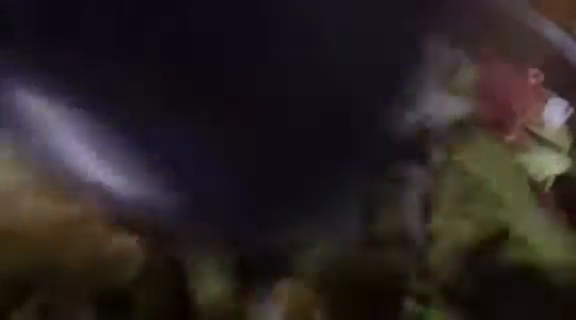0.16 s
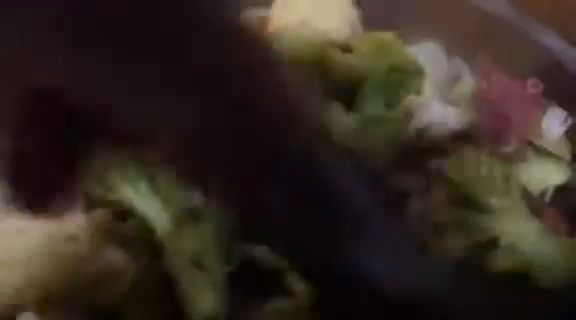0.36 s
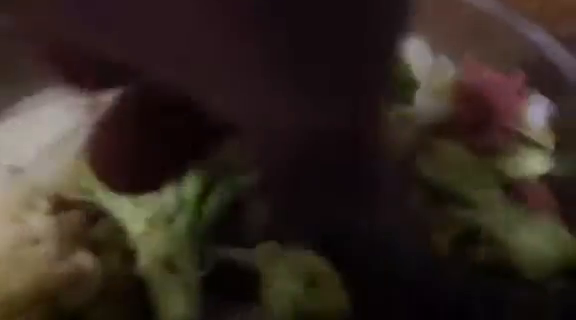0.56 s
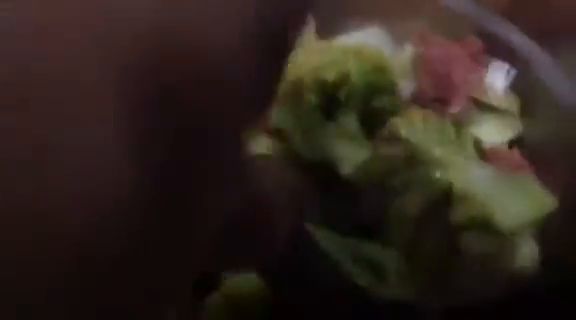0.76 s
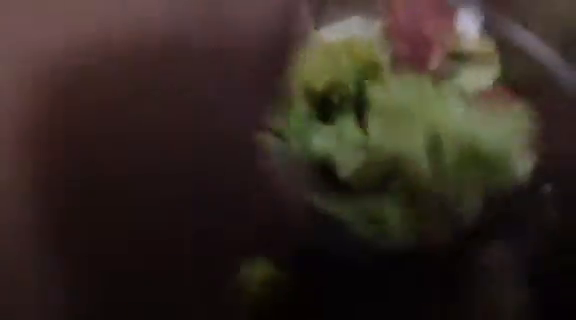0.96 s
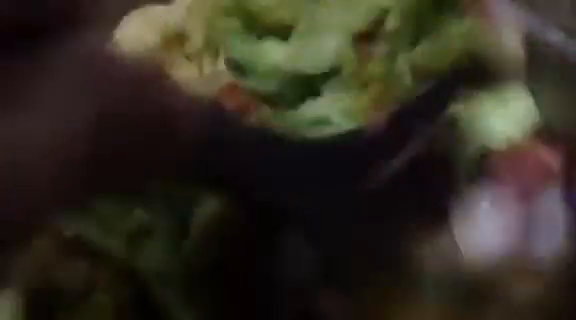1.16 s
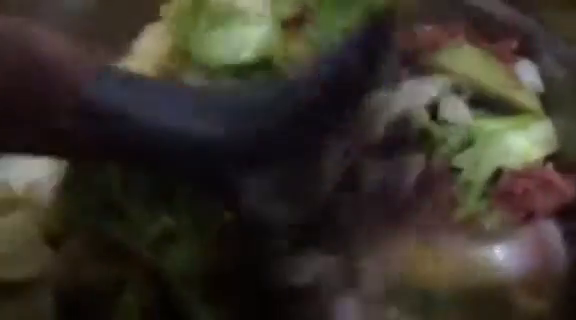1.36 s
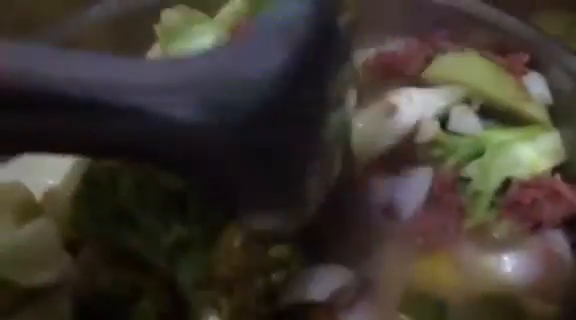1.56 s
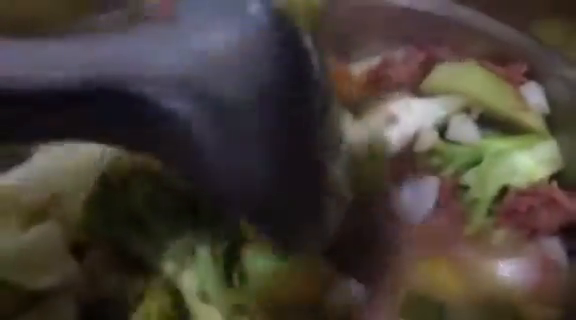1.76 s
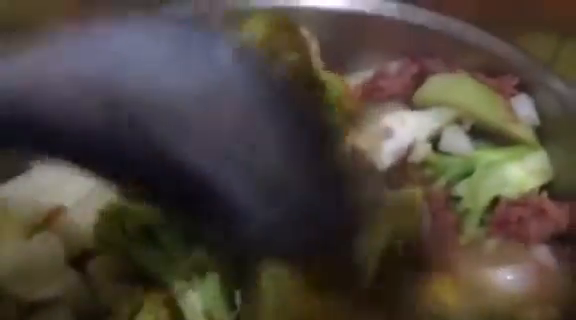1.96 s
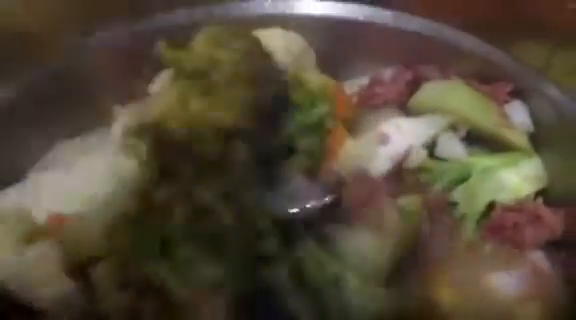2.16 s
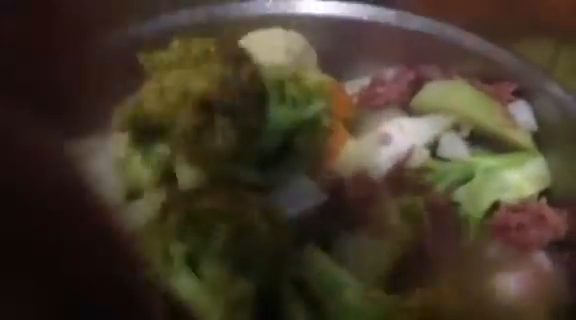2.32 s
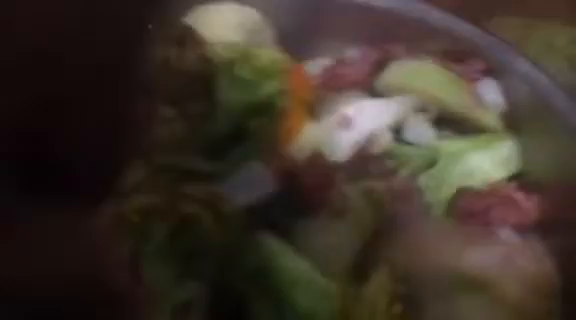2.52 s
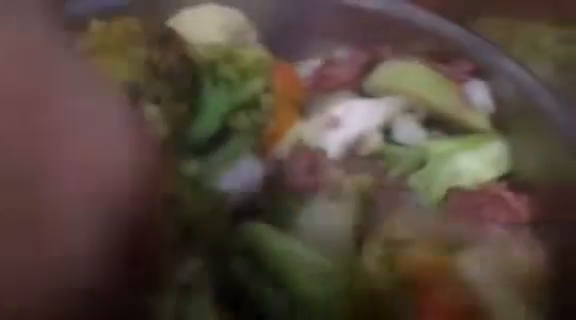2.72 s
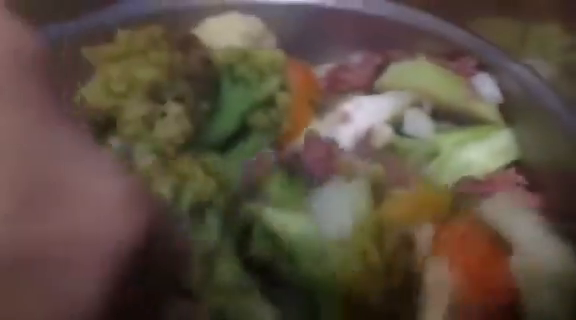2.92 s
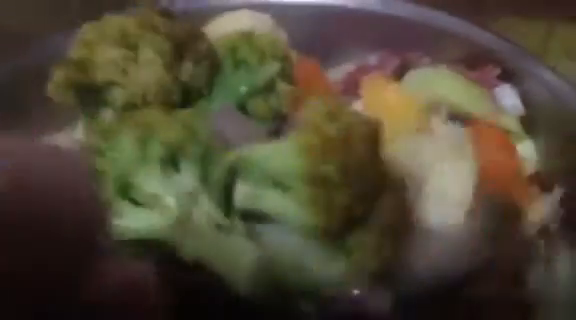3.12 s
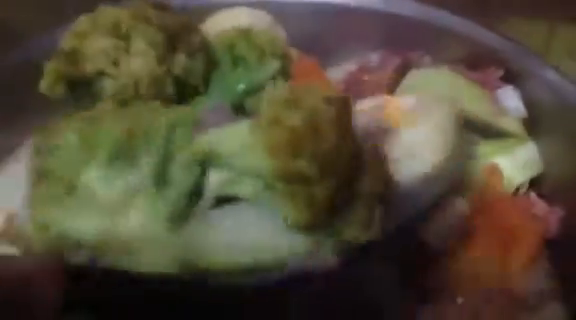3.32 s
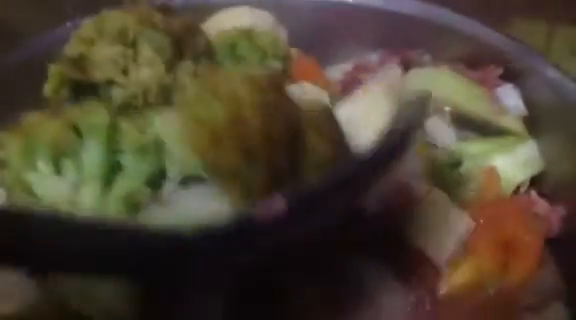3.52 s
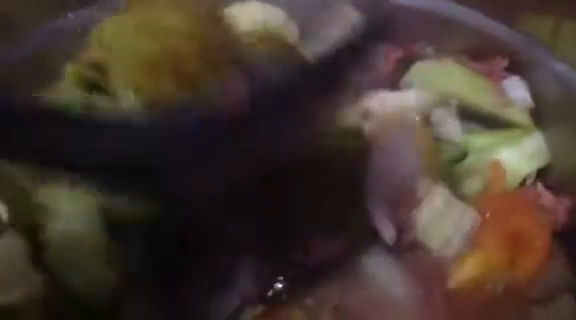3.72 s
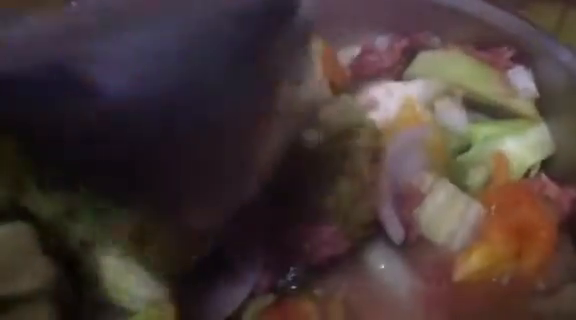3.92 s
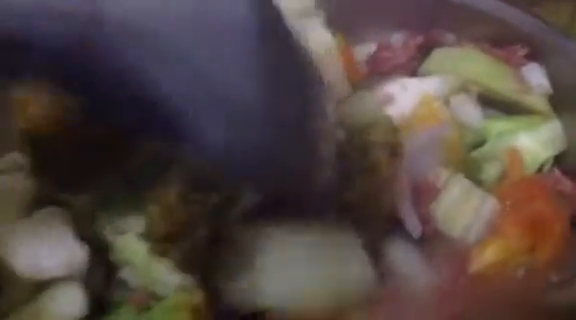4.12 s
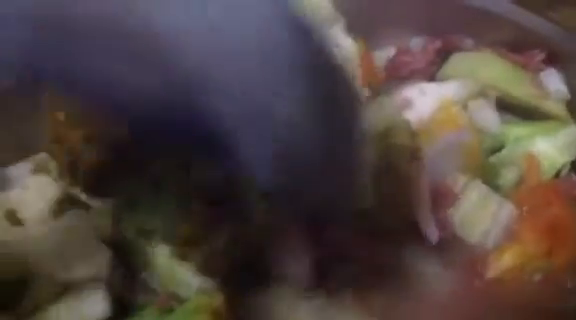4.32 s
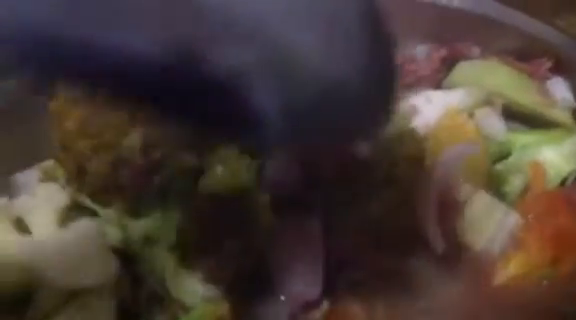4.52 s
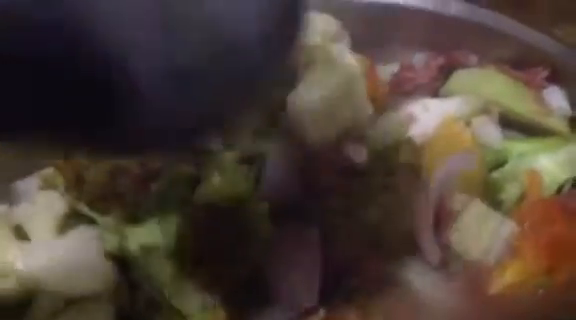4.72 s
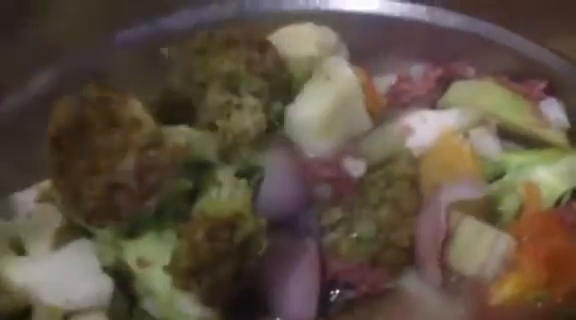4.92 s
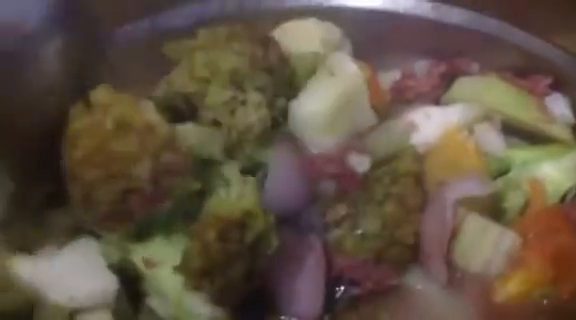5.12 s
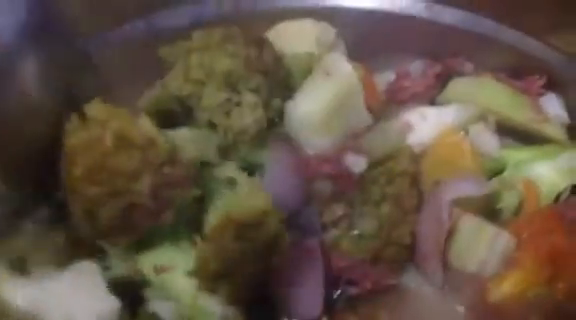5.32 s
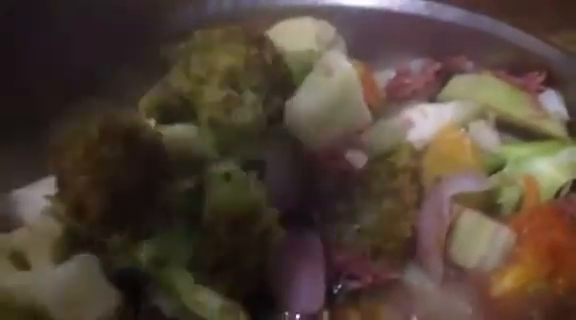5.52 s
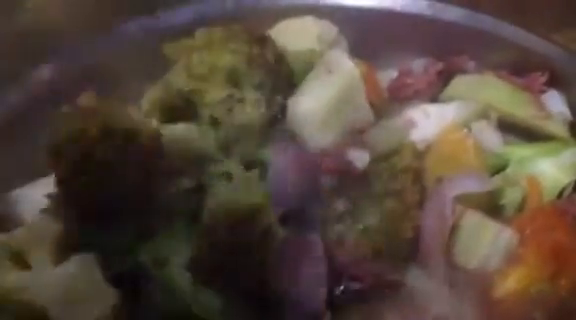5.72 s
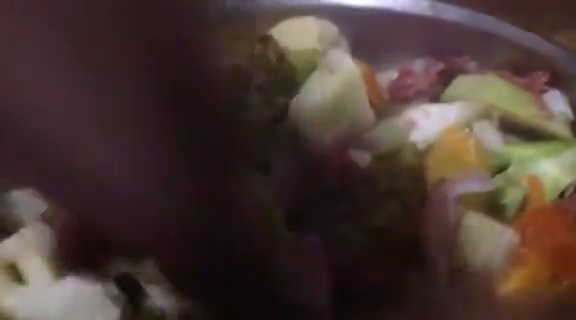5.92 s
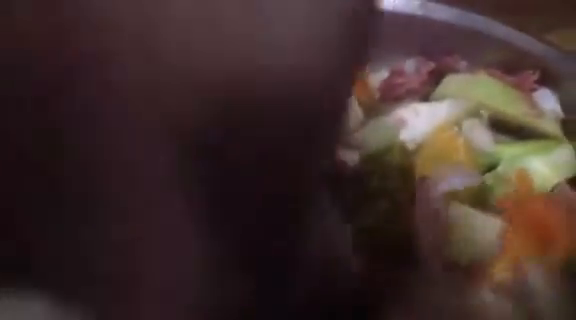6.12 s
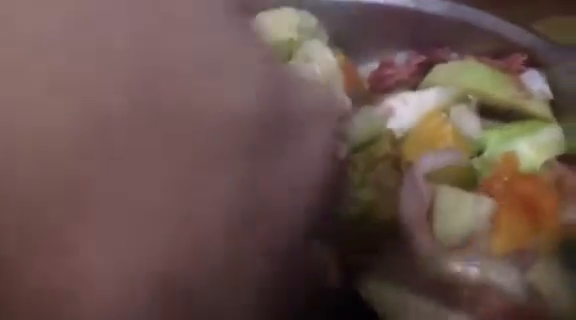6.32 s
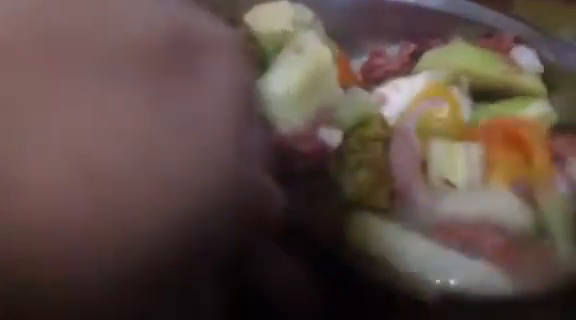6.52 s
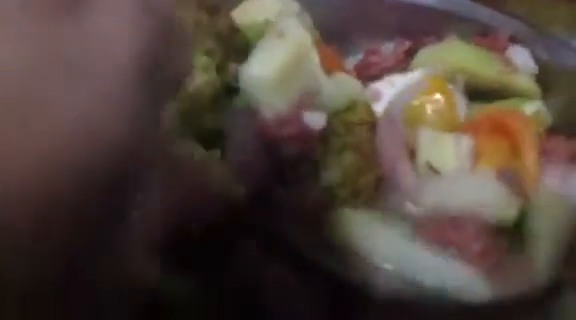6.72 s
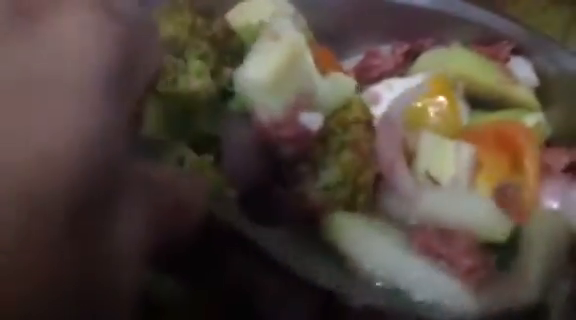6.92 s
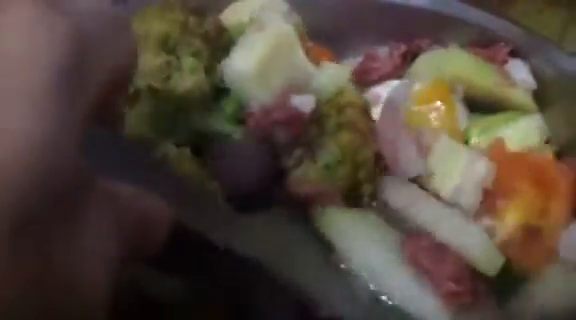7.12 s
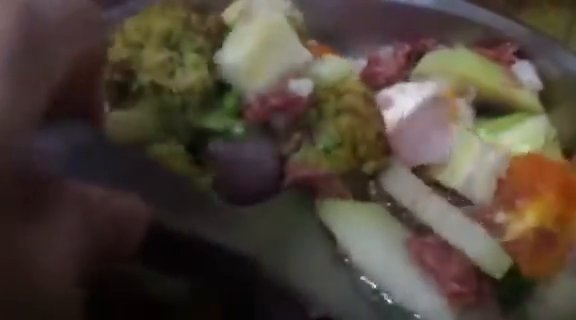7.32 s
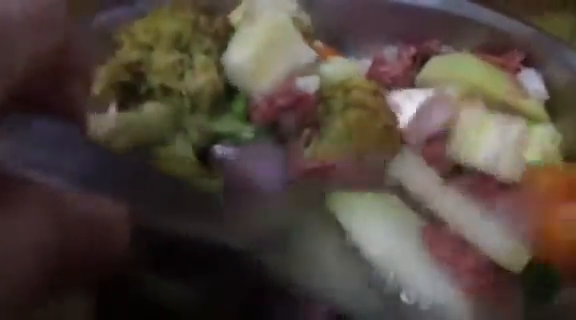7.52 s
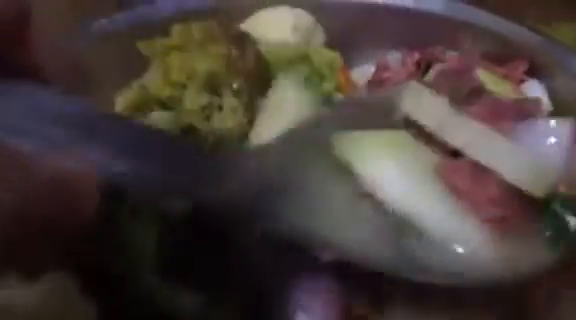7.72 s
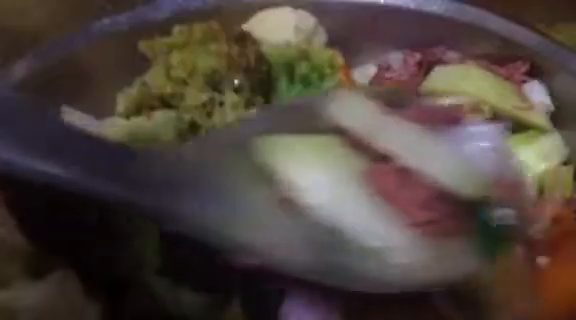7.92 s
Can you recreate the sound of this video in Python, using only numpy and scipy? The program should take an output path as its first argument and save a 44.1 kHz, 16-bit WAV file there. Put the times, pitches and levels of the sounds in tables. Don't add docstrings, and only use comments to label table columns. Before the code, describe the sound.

Steady gentle sizzling fills a small kitchen, brightening and dulling as a metal spoon moves the food. Short gritty scrapes, hollow little snaps and wet ticks come in clusters with each push. Three main metal clinks stand far above the rest: early and sharp, then softer, then loud and ringing. Room rumble and a faint distant appliance tone lie beneath, captured close with limited treble, slightly grainy compression and little echo.

```python
import sys
import numpy as np
from scipy import signal
from scipy.fft import rfft, irfft, dct
from scipy.io import wavfile
from scipy.ndimage import uniform_filter1d

SR = 44100
rng = np.random.default_rng(int(sys.argv[2]) if len(sys.argv) > 2 else 0)


def generate_wav(sig):
    pcm = np.round(np.clip(np.atleast_2d(sig).T, -1, 1) * 32767).astype(np.int16)
    wavfile.write(sys.argv[1], SR, pcm)


def nominal_scale(level):
    x = np.asarray(level, float) / 20
    return 10 ** x


N = 355446


def evened(x):
    return x / np.sqrt(np.mean(x ** 2) + 1e-20)


def peaked(x):
    return x / np.max(abs(x))


def read(points, hz):
    f, value = np.transpose(points)
    return np.interp(np.log(hz + 1), np.log(f + 1), value)


def add(mix, s, sound):
    part = mix[round(s * SR):][:len(sound)]
    part += sound[:len(part)]


def filtered(x, order, hz, kind="low"):
    return signal.sosfilt(signal.butter(order, hz, kind, fs=SR, output="sos"), x)


def coloured(x, spectrum):
    gain = nominal_scale(read(spectrum, np.fft.rfftfreq(len(x), 1 / SR)))
    return evened(irfft(rfft(x) * gain, len(x)))


def arches(rows, rest_db):
    t = np.arange(0, N + 64, 64) / SR
    power = nominal_scale(rest_db) ** 2
    for s, length, db in rows:
        power = power + nominal_scale(db) ** 2 * np.exp(-(3 * (t - s) / length) ** 2)
    return np.sqrt(np.interp(np.arange(N) / SR, t, power))


def wash(spectrum, patchy_db, flicker_db):
    frames = N // 128 + 5
    a, b, patches = rng.standard_normal((frames, 257, 3)).T
    patches = evened(uniform_filter1d(uniform_filter1d(patches, size=8, axis=0), size=14, axis=1))
    flicker = evened(uniform_filter1d(rng.standard_normal(frames), size=5))
    z = (a + 1j * b) * nominal_scale(patchy_db * patches + flicker_db * flicker)
    noise = signal.istft(z, nperseg=512, noverlap=384)[1][:N]
    return coloured(noise, spectrum)


def crackle(per_s, spread_db, cycles, low_hz, high_hz, count=20):
    struck = rng.random(N) < per_s / SR
    size = nominal_scale(spread_db * np.minimum(rng.exponential(1, N), 5)) * struck
    kind = rng.integers(0, count, N)
    t, out = np.arange(600) / SR, np.zeros(N)
    for k, hz in enumerate(np.geomspace(low_hz, high_hz, count)):
        grain = np.exp(-t * hz / cycles) * np.sin(2 * np.pi * hz * t)
        out += signal.oaconvolve(size * (kind == k), grain / np.linalg.norm(grain))[:N]
    return evened(out)


# [t/s, hiss level/dB]
STIR = [(0.0, -59), (0.7, -56), (1.0, -58.5), (1.37, -54), (1.82, -56), (2.4, -56), (2.71, -51.5),
        (3.1, -55), (3.34, -53.5), (4.4, -56), (4.78, -55), (6.17, -55.5), (6.51, -62.5), (6.98, -58.5),
        (7.231, -62.5), (7.62, -58), (7.8, -53.5), (8.06, -56)]
# [f/Hz, level/dB per Hz]
HISS = [(410, -22), (700, -20.5), (937, -2), (1180, 5), (1510, -8), (2000, -3), (2730, 4), (3160, -0.5),
        (3970, 0), (6820, -3.5), (7600, -5), (8400, -75), (10900, -84), (18500, -120)]
# [strongest t/s, length/s, level/dB]
SLIPPING = [
    (.65, 0.8, -56.5),
    (2.8, 0.73, -65),
    (3.38, 0.4, -50.5),
    (4.2, 1.33, -56.5),
    (4.76, 0.45, -49),
    (5.9, 1.24, -60.5),
    (7.58, 0.84, -57),
]


def food():
    hiss = wash(HISS, patchy_db=1.0, flicker_db=1.5)
    fine = nominal_scale(-5) * crackle(800, spread_db=3.6, cycles=1.8, low_hz=2000, high_hz=8010)
    slips = crackle(250, spread_db=3.4, cycles=4.0, low_hz=2200, high_hz=3500)
    level_db = np.interp(np.arange(N) / SR, *np.transpose(STIR))
    sizzle = evened(hiss + fine)
    bright_hz, open_db, dulling = 3500, -55, 0.37
    mids = signal.sosfiltfilt(signal.butter(2, bright_hz, fs=SR, output="sos"), sizzle)
    sizzle = sizzle + (nominal_scale(dulling * (open_db - level_db)) - 1) * mids
    resting_db = -64.5
    return nominal_scale(level_db) * sizzle + nominal_scale(-5.0) * arches(SLIPPING, resting_db) * slips


# [f/Hz, level/dB per Hz]
HUM = [(15, -58), (25, -16), (50, -16.5), (74, -9), (95, -13), (134, 0.5), (196, -4), (273, 1), (344, -5),
       (525, -4), (589, -3), (936, -12.5), (1180, -12.5), (1800, -16.5), (2500, -34.5), (3250, -46.5),
       (5500, -120)]
# [strongest t/s, length/s, level/dB]
SWELLS = [
    (0.0, 0.31, -51),
    (.65, 1.07, -52.5),
    (1.4, 0.44, -60),
    (2.58, 0.39, -52.5),
    (3.34, 0.23, -58.5),
    (5.1, 1.04, -54.5),
    (6.95, 0.84, -53.5),
    (7.45, 0.37, -58),
    (8.0, 1, -58.5),
]
# [strongest t/s, length/s, level/dB]
DRONE = [
    (.1, 0.4, -54.5),
    (.6, 0.34, -60),
    (1.0, 0.39, -61),
    (2.53, 0.57, -62.5),
    (4.31, 0.39, -61.5),
    (5.3, 0.58, -61),
    (7.1, 1.43, -59),
]


def hum():
    rumble = arches(SWELLS, -55.5) * wash(HUM, patchy_db=1.67, flicker_db=1.03)
    slow = uniform_filter1d(rng.standard_normal((2, N)), size=2500)
    a, b = uniform_filter1d(slow, size=2500)
    drone_hz = 293.4
    tone = evened(((a + 1j * b) * np.exp(2j * np.pi * drone_hz * np.arange(N) / SR)).real)
    return rumble + arches(DRONE, -69.5) * tone


def snap(db, hz, t60, tick_db):
    t = np.arange(3000) / SR
    wobble, tick = rng.standard_normal((2, len(t)))
    turns = np.cumsum(hz * (1 + 0.1 * evened(uniform_filter1d(wobble, size=30)))) / SR
    ring = nominal_scale(-60 * t / t60) * np.sin(2 * np.pi * turns) * np.minimum(t / .0007, 1)
    return nominal_scale(db) * (ring + nominal_scale(tick_db) * peaked(tick * nominal_scale(-60 * t / .009)))


def pieces(rows, t60, tick_db):
    out = np.zeros(N)
    for s, db, hz in rows:
        add(out, s, snap(db, hz, t60, tick_db))
    return out


# [t/s, peak level/dB, f/Hz]
SNAPS = [(0.091, -34.5, 3140), (0.622, -42, 2620), (1.309, -41, 3660), (1.4, -44.5, 2730),
         (1.465, -33.5, 3410), (2.465, -37, 2780), (2.739, -42, 3120), (3.283, -37.5, 2790),
         (3.319, -38.5, 2870), (3.414, -39.5, 2190), (3.485, -36, 2350), (3.567, -40.5, 2250),
         (3.667, -38, 3220), (3.731, -37, 2880), (4.524, -34, 2810), (4.534, -38.5, 3420),
         (4.575, -40.5, 2200), (4.693, -39, 3050), (4.839, -33, 2790), (4.925, -39.5, 3670),
         (6.047, -22.5, 2490), (6.065, -39.5, 2840), (6.233, -42, 2410), (6.975, -37.5, 2480),
         (7.465, -37.5, 2620), (7.551, -37, 3400), (7.558, -32, 2650), (7.74, -42, 2810),
         (7.799, -43, 3100)]


def snaps():
    return pieces(SNAPS, t60=0.023, tick_db=-5.5)


# [f/Hz, level/dB per Hz]
RATTLE = [(180, -45), (300, -30.5), (1180, -19), (1530, -28.5), (1940, -29.5), (2300, -29), (2600, -16.5),
          (4880, -22), (7210, -18.5), (8400, -24.5), (10900, -73), (18500, -120)]


def clink(modes, db, crack_db, rattle_db, rattle_t60):
    t = np.arange(SR // 2) / SR
    phases, noise = rng.random((30, 2)), rng.standard_normal((2, len(t)))
    ring = np.zeros(len(t))
    for (hz, mode_db, t60), (lag, pace) in zip(modes, phases):
        turns = (12 + 50 * pace) * t + .4 * np.sin(2 * np.pi * (9 + 30 * lag) * t)
        flutter = 1 + .5 * np.cos(2 * np.pi * turns)
        ring += nominal_scale(mode_db - 60 * t / t60) * flutter * np.sin(2 * np.pi * (hz * t + .6 * lag))
    crack = coloured(noise[0], RATTLE) * nominal_scale(-60 * t / 0.034)
    rattle = coloured(noise[1], RATTLE) * nominal_scale(-60 * t / rattle_t60)
    small = nominal_scale(crack_db) * peaked(crack) + nominal_scale(rattle_db) * peaked(rattle)
    small = filtered(small, 3, 1.35 * modes[0][0], "high")
    contact = 1 + .7 * np.exp(-t / 0.014)
    blow = ring / 10 * contact + small
    return nominal_scale(db) * blow * np.minimum(t / 0.00081, 1) ** 2


# [t/s, peak level/dB, crack re peak/dB, rattle re peak/dB, rattle t60/s]
CLINKS = [
    (.455, -8.5, -3, -7, 0.062),
    (2.5526, -20, 4, -10.5, 0.096),
    (5.7727, -7, -1, -6.5, 0.13),
    (5.818, -24.5, -0.5, -8, 0.12),
]
# [f/Hz, level/dB, t60/s]
WALL = [(1116, -3, 0.09), (1192, -2, 0.1), (1850, -7, 0.1), (1933, -1, 0.16), (2010, -7, 0.18),
        (2628, -2, 0.13), (2700, 4, 0.1), (2800, 1, 0.09), (2908, -5, 0.08), (3093, -6, 0.1),
        (3289, -10, 0.15), (3549, 0, 0.13), (4050, 2, 0.06), (4532, -4, 0.12), (4793, -3, 0.14),
        (4985, -7, 0.18), (5484, -3, 0.13), (5840, -7, 0.15), (6060, 0, 0.08), (6500, 6, 0.05),
        (6987, -1, 0.1), (7200, 2, 0.09)]
# [f/Hz, level/dB, t60/s]
BOTTOM = [(380, 3, 0.1), (458, 4, 0.13), (600, -1, 0.11), (1114, 1, 0.27), (1200, -1, 0.12),
          (1350, 1, 0.08), (1696, -6, 0.13), (1954, -4, 0.13), (2406, 3, 0.09), (2700, 6, 0.04),
          (2934, 4, 0.05), (3903, -5, 0.1), (4474, -8, 0.13), (6800, 2, 0.06)]
# [f/Hz, level/dB, t60/s]
RIM = [(571, 3, 0.05), (700, 4, 0.04), (1235, -10, 0.23), (1695, -6, 0.21), (1781, -1, 0.19),
       (1852, -3, 0.15), (1900, -1, 0.09), (1959, 0, 0.2), (2100, 4, 0.06), (2004, -5, 0.32),
       (2530, -1, 0.16), (2620, 3, 0.14), (2677, -5, 0.15), (2838, -1, 0.12), (3129, -14, 0.33),
       (3528, -8, 0.21), (3614, -2, 0.5), (3705, 0, 0.18), (4050, -2, 0.19), (4210, -9, 0.18),
       (4545, -7, 0.15), (4820, -12, 0.17), (4978, 6, 0.1), (5430, -9, 0.21), (5930, -10, 0.17),
       (6530, 0, 0.11), (6720, -8, 0.21), (6980, -6, 0.11), (7400, -5, 0.12), (7555, -10, 0.2)]


def clinks():
    out = np.zeros(N)
    for (s, *row), modes in zip(CLINKS, (WALL, BOTTOM, RIM, RIM)):
        add(out, s, clink(modes, *row))
    return out


def knock(db, hz, t60, rise):
    t = np.arange(SR // 5) / SR
    push = (1 - np.exp(-t / rise)) * nominal_scale(-60 * t / t60)
    return nominal_scale(db) * peaked(push * np.sin(2 * np.pi * hz * t))


# [t/s, peak level/dB,
# f/Hz, t60/s, rise/s]
KNOCKS = [(0.461, -37.5, 203, 0.14, 0.0035), (0.56, -20, 377, 0.0087, 0.0013),
          (0.569, -32, 178, 0.075, 0.0027), (0.623, -25.5, 252, 0.016, 0.0023),
          (0.628, -34, 180, 0.034, 0.00056), (2.5092, -33.5, 208, 0.08, 0.0039),
          (2.524, -34, 207, 0.044, 0.0029), (2.5358, -42, 208, .04, .001),
          (.456, -32.5, 417, 0.032, 0.00082), (.5645, -33.5, 620, 0.0096, 0.00062),
          (5.776, -39, 209, 0.081, 0.0086), (5.774, -40, 520, .2, .002), (5.773, -14, 1950, .045, .0006),
          (5.773, -21, 5950, .04, .0004), (5.773, -24, 6500, .05, .0004), (5.773, -27, 680, .04, .001),
          (.46, -36, 1030, .07, .002), (.462, -37, 560, .08, .003), (.554, -36, 1150, .05, .001),
          (.5535, -36, 6000, .03, .0005), (.5535, -38, 2900, .04, .0005)]


def knocks():
    out = np.zeros(N)
    for s, *row in KNOCKS:
        add(out, s, knock(*row))
    return out


# [t/s, peak level/dB, f/Hz]
PLOPS = [(0.554, -29, 1770), (0.983, -42, 1387), (1.169, -44, 820), (1.284, -43, 1164),
         (1.356, -41.5, 1170), (2.069, -44.5, 2050), (2.377, -42, 1830), (3.012, -42.5, 760),
         (3.036, -40.5, 1090), (3.748, -42, 1243), (3.991, -45, 1230), (5.087, -43.5, 1314),
         (6.319, -51, 1070), (6.939, -43, 786), (7.845, -43.5, 1600)]


def plops():
    return pieces(PLOPS, t60=0.039, tick_db=-9.5)


def scrape(length, db, hz, width_hz):
    t = np.arange(4096) / SR
    noise, grit = rng.standard_normal((2, len(t)))
    slips = noise * nominal_scale(4 * evened(uniform_filter1d(grit, size=60)))
    body = 1 / (1 + (2 * (np.fft.rfftfreq(len(t), 1 / SR) - hz) / width_hz) ** 2)
    stroke = np.sin(np.pi * np.minimum(t / length, 1) ** .6)
    return nominal_scale(db) * evened(irfft(rfft(slips) * body)) * stroke


# [t/s, length/s, level/dB, centre f/Hz, bandwidth/Hz]
SCRAPES = [(0.555, 0.015, -40, 5450, 4070), (1.162, 0.053, -49, 865, 600), (1.334, 0.087, -63, 1510, 2020),
           (1.776, 0.065, -52.5, 2030, 3120), (2.373, 0.026, -43.5, 1760, 1480),
           (2.437, 0.041, -55.5, 2700, 800), (2.493, 0.067, -49, 4080, 4000),
           (2.544, 0.0095, -48, 3980, 5000), (3.15, 0.11, -51, 2430, 3970), (4.676, 0.058, -53, 2830, 900),
           (4.828, 0.079, -54.5, 2660, 910), (6.022, 0.038, -41.5, 1900, 5000),
           (6.041, 0.046, -43.5, 3240, 1500), (6.22, 0.1, -53.5, 3000, 3980),
           (6.315, 0.027, -55.5, 5030, 2970), (7.143, 0.015, -55, 6540, 3000)]


def scrapes():
    out = np.zeros(N)
    for s, *row in SCRAPES:
        add(out, s, scrape(*row))
    return out


# [t/s, peak level/dB, f/Hz]
MORE_SNAPS = [(0.6534, -40, 2750), (0.7203, -39, 2550), (0.8225, -37.5, 3000), (0.8394, -40, 2560),
              (1.28, -37, 2740), (1.3723, -37, 2970), (1.4824, -40.5, 2960), (2.7591, -41.5, 3020),
              (2.817, -42, 2780), (2.9294, -45, 3020), (3.3543, -39, 2790), (3.3927, -41.5, 2810),
              (3.5354, -39, 2870), (4.7044, -37, 2760), (4.8165, -33.5, 2940), (5.0294, -44, 2830),
              (5.0794, -44, 2810), (6.2494, -39, 2410), (7.656, -44, 2280), (7.9054, -47, 2660)]


def more_snaps():
    return nominal_scale(-4.5) * pieces(MORE_SNAPS, t60=0.023, tick_db=-5.5)


# [t/s, peak level/dB, f/Hz]
BURSTS = [(0.771, -42.5, 3940), (1.34, -35.5, 3140), (1.555, -39, 4200), (1.805, -42.5, 2650),
          (2.399, -48.5, 3400), (3.162, -40, 4100), (3.165, -41, 1380), (3.192, -37.5, 2750),
          (4.609, -47, 3340), (4.974, -41, 3030), (5.346, -45, 3030), (6.024, -37.5, 2880),
          (6.254, -43, 1256), (7.146, -42.5, 2210), (7.162, -38, 2960), (7.343, -46.5, 2370),
          (7.481, -50, 1180), (7.687, -47.5, 3140)]


def bursts():
    return pieces(BURSTS, t60=0.022, tick_db=9)


# [t/s, peak level/dB, f/Hz]
SPITS = [(0.8654, -38, 4820), (1.2112, -48, 4530), (1.391, -41, 5050), (1.437, -40, 6450),
         (1.5055, -42, 5400), (1.5214, -45, 7370), (1.8392, -42, 7140), (1.887, -42, 6100),
         (2.226, -44, 6690), (2.4633, -41.5, 6650), (2.7454, -44, 4610), (2.8476, -44, 6800),
         (2.865, -42, 7210), (2.8993, -41, 6960), (2.9274, -48, 6900), (3.2252, -40, 7350),
         (3.4246, -42, 4800), (3.4555, -44, 5070), (3.702, -41, 6600), (3.8402, -45, 4600),
         (4.0257, -46, 5240), (4.6266, -44, 4740), (4.9242, -37, 4700), (5.1896, -48, 5640),
         (5.673, -42, 4600), (6.2259, -42, 6800), (6.2575, -43, 6800), (6.319, -40, 6000),
         (6.582, -44, 5250), (7.015, -47, 5100), (7.148, -42.5, 7010), (7.48, -40.5, 5740),
         (7.6868, -44, 5400), (7.7204, -43, 6790), (7.74, -39, 4700), (7.847, -45, 5540),
         (7.866, -45, 7200), (7.9533, -42, 5460)]


def spits():
    return pieces(SPITS, t60=.012, tick_db=-3)


def kitchen(x, t60=0.22):
    taps = np.zeros(SR // 2)
    at = np.arange(200, len(taps) - 20, 20) + rng.integers(0, 20, (len(taps) - 201) // 20)
    taps[at] = rng.choice([-1., 1.], len(at)) * nominal_scale(-60 * at / SR / t60)
    return signal.fftconvolve(x, taps / np.linalg.norm(taps))[:N]


def scene():
    steady = food() + hum()
    events = snaps() + clinks() + knocks() + plops() + scrapes() + more_snaps() + bursts() + spits()
    events = filtered(events, 4, 90, "high")
    thin = filtered(events, 1, 500, "high")
    return (steady + events + nominal_scale(-9) * kitchen(thin))[None]


# [from t/s, level added to the step/dB]
THRIFT = [(0, 3.7), (.46, 7), (.65, 3.7), (1.35, .5), (2.1, 2.5), (2.59, 6), (2.72, -3), (4.9, 2.5),
          (5.95, 1.5), (6.3, 2.5), (7.7, 0)]


def thrift_db(t):
    s, db = np.transpose(THRIFT)
    return uniform_filter1d(db[np.searchsorted(s[1:], t)], size=3)


# [f/Hz, level/dB]
STEP = [(100, -58), (500, -51), (1000, -47), (1500, -44), (2600, -45), (4000, -45.5), (5500, -48.5),
        (7000, -51), (8300, -50)]


def step_db(lines, hz, size=12):
    level_db = 10 * np.log10(abs(uniform_filter1d(lines ** 2, size=64, axis=1)) + 1e-20)
    level_db = np.minimum(level_db, np.roll(level_db, 1, axis=0) + 2)
    t = (np.arange(len(lines)) - 1) * len(hz) / SR
    quiet_db = read(STEP, hz) + thrift_db(t)[:, None]
    chance = rng.standard_normal((len(lines), len(hz) // size + 1))
    chance = evened(uniform_filter1d(chance, size=3, axis=0))
    wander_db = 2.5 * np.repeat(chance, size, axis=1)[:, :len(hz)]
    return quiet_db + .92 * np.maximum(level_db - quiet_db - 2, 0) + wander_db


def coarse_spectrum(x, size=1024, grid=274):
    half, window = size // 2, signal.windows.kaiser_bessel_derived(2 * size, 4 * np.pi)
    padded = np.pad(x, (2 * size - grid, 2 * size), "reflect")
    frames = np.lib.stride_tricks.sliding_window_view(padded, 2 * size)[::size] * window
    a, b, c, d = np.split(frames, 4, axis=1)
    lines = dct(np.hstack([-c[:, ::-1] - d, a - b[:, ::-1]]), type=4, norm="ortho")
    step = nominal_scale(step_db(lines, (np.arange(size) + .5) * SR / 2 / size))
    whole = np.floor((abs(lines) / step) ** .75 + .4)
    kept = np.sign(lines) * whole ** (4 / 3) * step
    spill = np.roll(kept, 1, axis=1) - np.roll(kept, 2, axis=1) + np.roll(kept, -1, axis=1)
    u = dct(kept + .06 * spill, type=4, norm="ortho")
    lo, hi = u[:, :half], u[:, half:]
    first, second = np.hstack([hi, -hi[:, ::-1]]), np.hstack([-lo[:, ::-1], -lo])
    lapped = first[1:] * window[:size] + second[:-1] * window[size:]
    return lapped.ravel()[size - grid:][:N]


def band_limit(x):
    return signal.sosfilt(signal.butter(12, 8590, fs=SR, output="sos"), x)


def record(dry):
    thin = filtered(dry[0], 1, 60, "high")
    edge = signal.firwin(127, 7850, window=("kaiser", 6), fs=SR)
    mix = coarse_spectrum(signal.oaconvolve(thin, edge, "same"))[None]
    return band_limit(mix)


dry = scene()
out = record(dry)
generate_wav(out)
```